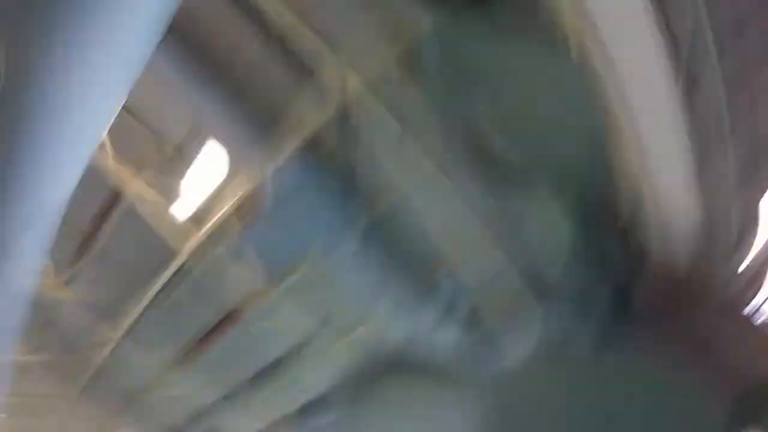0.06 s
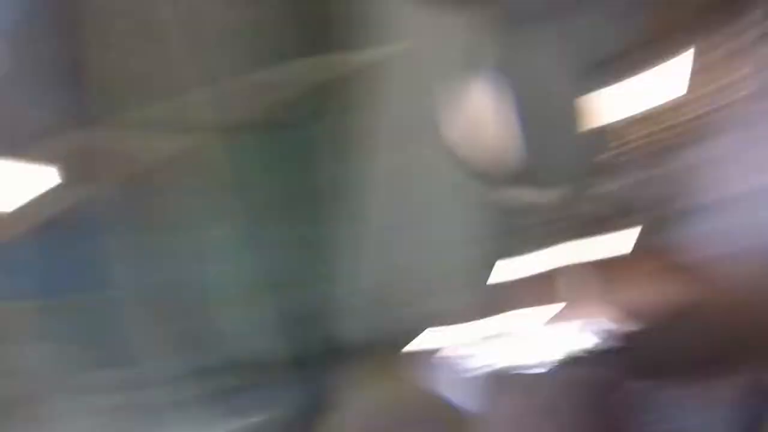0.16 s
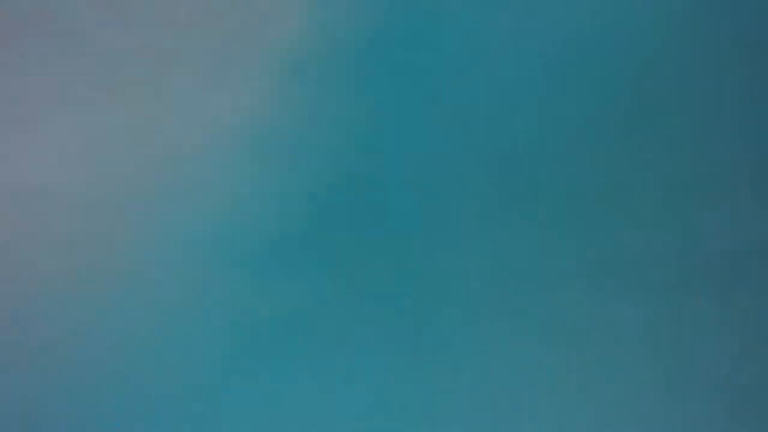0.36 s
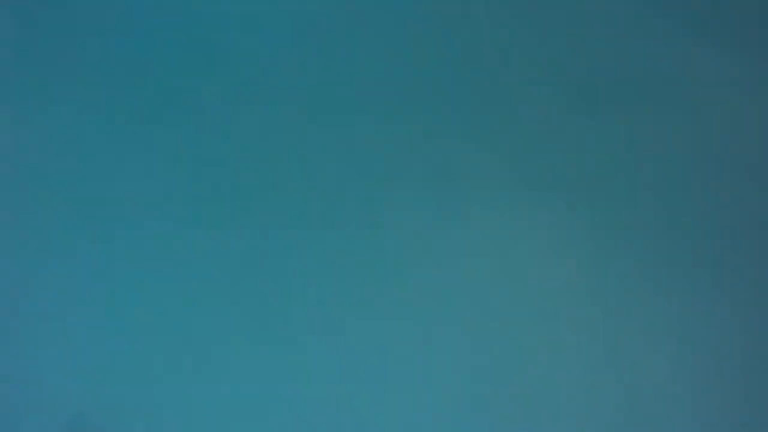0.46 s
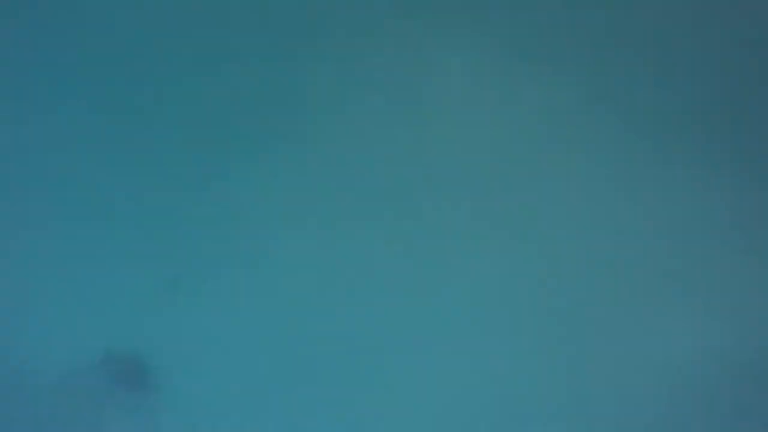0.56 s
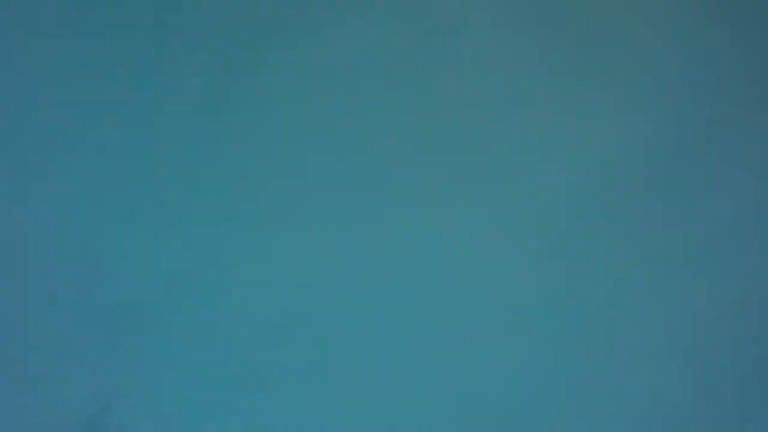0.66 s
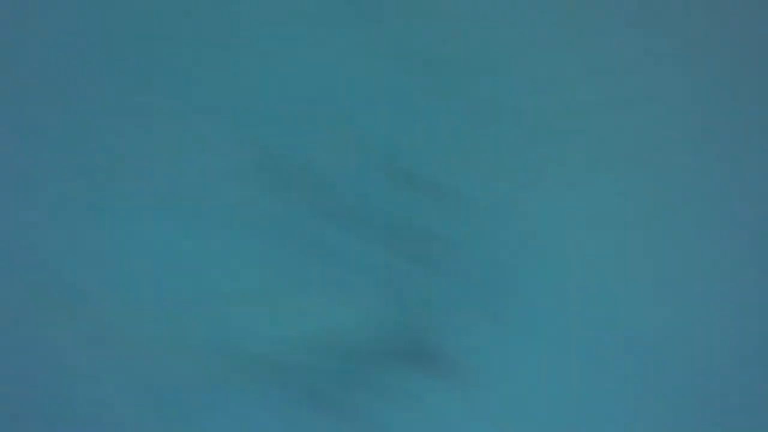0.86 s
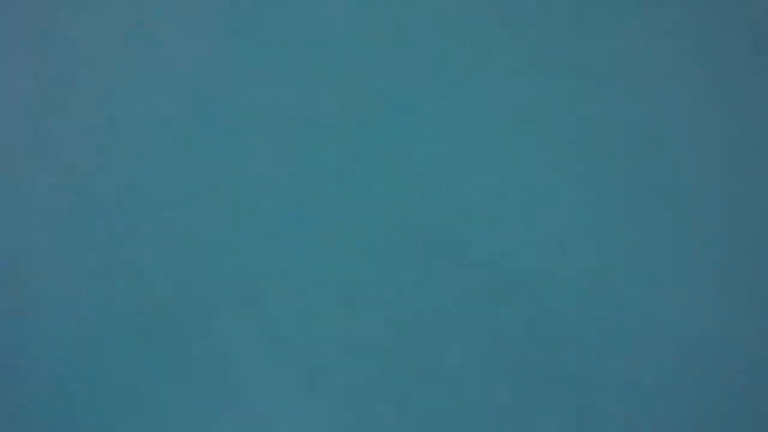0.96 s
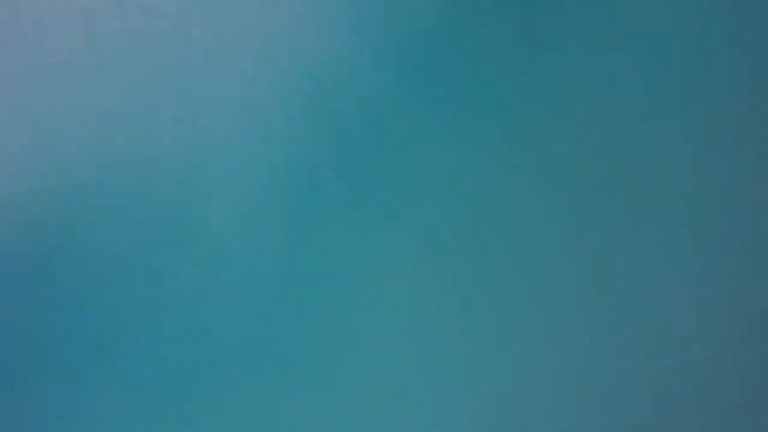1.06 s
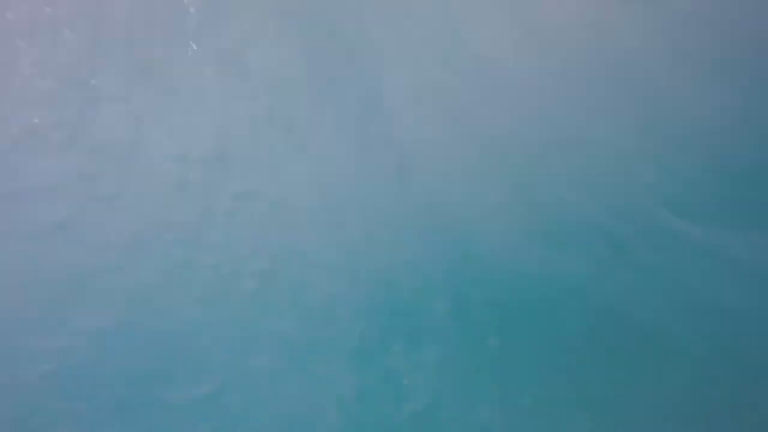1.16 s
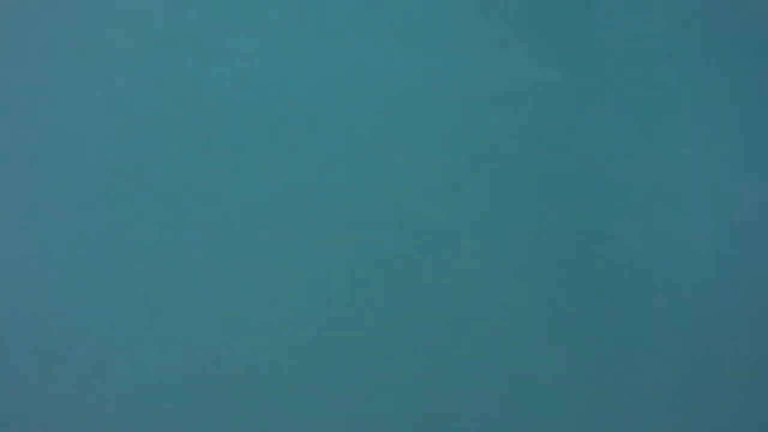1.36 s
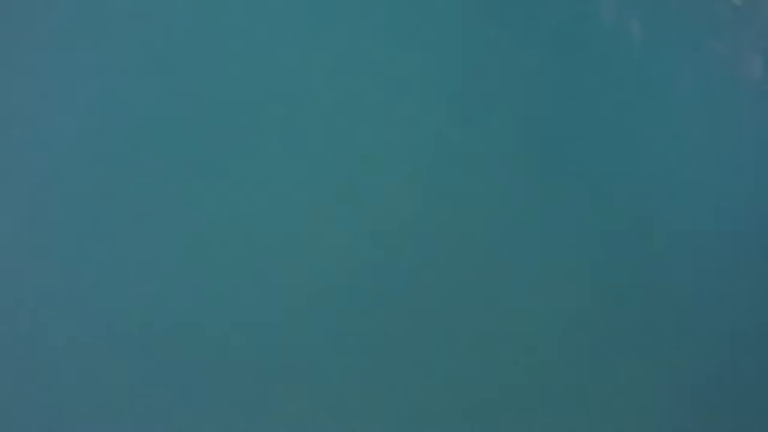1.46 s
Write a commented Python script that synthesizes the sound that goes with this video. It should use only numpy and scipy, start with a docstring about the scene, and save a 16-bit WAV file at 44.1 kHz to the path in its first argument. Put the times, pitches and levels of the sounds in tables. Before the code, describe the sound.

Close splashing water, heard from a waterproof camera riding a slide into an indoor pool. A hissing rush and crackling spray lead to a thudding plunge, churning bubbles, another splash and a few ticking drops.

```python
"""A camera in a waterproof case rides a water slide into an indoor pool.
Water rushes down the chute; spray crackles and slaps the case. At 0.5 s the case plunges in with
a pressure surge, the rush fades, and air dragged under churns away as ringing bubbles. Near 1 s
the thrown-up water falls back in a second splash. Last drops and bubbles tick against the case."""
import sys
import numpy as np
from scipy import signal
from scipy.fft import rfft, irfft
from scipy.io import wavfile

SR = 44100
rng = np.random.default_rng(int(sys.argv[2]) if len(sys.argv) > 2 else 0)


def bounce(signal):
    """Save signal as a 16-bit WAV file at the path given by the first command-line argument."""
    frames = np.transpose(np.atleast_2d(signal))
    limited = np.clip(frames, -1, 1)
    pcm = np.round(limited * 32767).astype(np.int16)
    wavfile.write(sys.argv[1], SR, pcm)


N = 66150
T = np.arange(N) / SR

# Spectrum of the chute rush and the hall tail. Each row: frequency in Hz, density in dB.
RUSH_SPECTRUM = [(100, -29), (310, -24), (550, -5), (800, -14), (1000, -16), (1400, 3), (1900, -7.5),
                 (2400, -3), (3200, -5.5), (4800, -20), (6100, -20.5), (7300, -35), (8600, -28),
                 (14000, -65)]


def from_db(db):
    """Decibels to gain."""
    return 10 ** (np.asarray(db) / 20)


def unit_rms(x):
    """Scale to rms 1."""
    return x / np.sqrt(np.mean(x ** 2) + 1e-20)


def envelope(rows):
    """Gain over time. Each row: time in seconds, level in dB."""
    return from_db(np.interp(T, *np.transpose(rows)))


def gain_at(spectrum, hz):
    """Gain of a spectrum, interpolated over log frequency."""
    points_hz, db = np.transpose(spectrum)
    return from_db(np.interp(np.log(hz), np.log(points_hz), db))


def add(out, start_s, sound):
    """Mix a sound into out."""
    i = int(np.clip(start_s * SR, 0, N - 1))
    out[i:i + len(sound)] += sound[:N - i]


def noise(spectrum):
    """Steady shaped noise, falling steeply beyond the spectrum's ends; rms 1."""
    hz = np.maximum(np.arange(N // 2 + 1) * SR / N, 1)
    skirts = 1 / np.sqrt((1 + (spectrum[0][0] / hz) ** 8) * (1 + (hz / spectrum[-1][0]) ** 8))
    return unit_rms(irfft(rfft(rng.standard_normal(N)) * gain_at(spectrum, hz) * skirts, N))


def resonate(x, hz, width_hz):
    """Two-pole resonance, peak gain 1."""
    radius = np.exp(-np.pi * width_hz / SR)
    feedforward = np.array([1, 0, -1]) * (1 - radius ** 2) / 2
    feedback = [1, -2 * radius * np.cos(2 * np.pi * hz / SR), radius ** 2]
    return signal.lfilter(feedforward, feedback, x + 1e-18)


def ring(hz, glide_oct_per_s, swell_s, t60_s):
    """Gliding sine that swells and decays; envelope peak 1."""
    t = T[:int(np.clip((t60_s + 2 * swell_s) * SR, 16, N))]
    shape = (1 - np.exp(-(t / swell_s) ** 2)) * from_db(-60 * t / t60_s)
    phase = 2 * np.pi * np.cumsum(hz * 2 ** (glide_oct_per_s * t)) / SR
    return np.sin(phase) * shape / (shape.max() + 1e-12)


def bubble_cloud(spectrum, per_s, t60_cycles, spread_db, rise_oct, pitches):
    """Bubbles of random onset and strength, each rising in pitch as it rings down; rms 1."""
    out = np.zeros(N)
    for hz in np.geomspace(spectrum[0][0], spectrum[-1][0], pitches):
        births = rng.random(N) < per_s / pitches / SR
        strengths = from_db(spread_db * np.minimum(rng.exponential(1, N), 4)) * rng.choice([-1, 1], N)
        hz = hz * np.exp(0.044 * rng.uniform(-0.96, 1))
        bubble = ring(hz, rise_oct * hz / t60_cycles, swell_s=0.28 / hz, t60_s=t60_cycles / hz)
        train = signal.fftconvolve(births * strengths, bubble)[:N]
        out += gain_at(spectrum, hz) * np.sqrt(hz) * unit_rms(train)  # higher bands are wider
    return unit_rms(out)


def chute():
    """A sheet of water hisses down the slide and excites hollow resonances."""
    # Each row: time in seconds, level in dB.
    rush_levels = [(0, -38.5), (.14, -34.5), (.22, -36.5), (.3, -37.5), (.5, -30.5), (.8, -63), (1.5, -74)]
    # Each row: frequency in Hz, width in Hz, level in dB.
    resonances = [(806, 51, -8), (1377, 43, -3)]
    hollow = sum(from_db(db) * unit_rms(resonate(rng.standard_normal(N), hz, width_hz))
                 for hz, width_hz, db in resonances)
    return envelope(rush_levels) * unit_rms(noise(RUSH_SPECTRUM) + hollow)


def churn():
    """Air dragged under breaks into bubbles and large pockets; the flow buffets the case."""
    # Each row: time in seconds, level in dB.
    bubble_levels = [(0, -53), (.305, -42.5), (.325, -40), (.41, -26), (.46, -30.5), (.57, -27),
                     (.62, -22.5), (.68, -27), (.74, -21.5), (.79, -34.5), (.86, -31), (.92, -38),
                     (.965, -31), (1.015, -17.5), (1.08, -21.5), (1.125, -20.5), (1.18, -30), (1.29, -35),
                     (1.41, -36.5), (1.5, -40.5)]
    pocket_levels = [(0, -49), (.29, -44), (.325, -28), (.4, -37.5), (.48, -34.5), (.52, -27), (.57, -24.5),
                     (.62, -26.5), (.67, -19), (.77, -30.5), (.81, -21), (.86, -35.5), (.95, -30),
                     (1.01, -21.5), (1.1, -29), (1.25, -36.5), (1.34, -43.5), (1.5, -45.5)]
    buffet_levels = [(0, -38.5), (.08, -33.5), (.18, -36.5), (.34, -34), (.44, -40), (.52, -20), (.6, -53),
                     (.73, -30), (.86, -41), (.94, -31.5), (1.04, -21.5), (1.12, -38.5), (1.3, -44),
                     (1.5, -40.5)]
    # Each row: frequency in Hz, density in dB.
    bubble_spectrum = [(280, -1), (400, -5), (560, -2.5), (760, -2.5), (900, -18.5), (1100, -39)]
    pocket_spectrum = [(75, 0.5), (110, -1.5), (170, -1), (280, -2.5)]
    buffet_spectrum = [(14, 16), (40, 0), (65, -2.5), (100, -36)]
    bubbles = bubble_cloud(bubble_spectrum, per_s=1200, t60_cycles=14.3,
                           spread_db=1.5, rise_oct=0.31, pitches=40)
    pockets = bubble_cloud(pocket_spectrum, per_s=700, t60_cycles=5.8,
                           spread_db=2.6, rise_oct=0.22, pitches=14)
    buffet = envelope(buffet_levels) * noise(buffet_spectrum)
    return envelope(bubble_levels) * bubbles + envelope(pocket_levels) * pockets + buffet


def glugs():
    """Big bubbles pinch off next to the case."""
    # Each row: start in seconds, peak in dB, pitch in Hz, glide in octaves/s, swell and t60 in seconds.
    big_bubbles = [(0.199, -15, 162.4, -33, 0.0066, 0.11), (.3966, -17, 488, -4, 0.001, 0.035),
                   (.503, -7, 228, 21, 0.0038, 0.017), (0.507, -12.5, 119, -10, 0.0024, 0.089),
                   (.553, -15, 114.3, -2.5, 0.0019, 0.18), (.6, -14.5, 470, 3, 0.0017, .035),
                   (.601, -9.5, 765, 3, 0.003, 0.037), (.603, -10, 1063, 8, 0.00054, 0.028),
                   (.66, -15.5, 547.5, 2.5, 0.0041, 0.18), (.686, -14, 744, 8, 0.0031, 0.059),
                   (.8395, -11, 566, -1, 0.0022, 0.011), (1.045, -19, 1015, 7, .002, .04),
                   (1.113, -14.5, 507, 3.5, 0.0028, 0.15), (1.24, -23.5, 330, 3, 0.0034, 0.12)]
    out = np.zeros(N)
    for start_s, db, hz, glide_oct_per_s, swell_s, t60_s in big_bubbles:
        add(out, start_s, from_db(db) * ring(hz, glide_oct_per_s, swell_s, t60_s))
    return out


def surges():
    """Pressure drops and swings back as the case ploughs into the water."""
    # Each row: start in seconds, peak in dB, pitch in Hz, swell and t60 in seconds.
    impacts = [(0.208, -16, 32, 0.012, 0.07), (0.499, -8, 37.7, 0.012, 0.072)]
    out = np.zeros(N)
    for start_s, db, hz, swell_s, t60_s in impacts:
        add(out, start_s, -from_db(db) * ring(hz, 0, swell_s, t60_s))
    return out


def spray():
    """Drops crackle on the case among small ringing bubbles; fizz rises where spray meets air."""
    # Each row: time in seconds, level in dB.
    spray_levels = [(0, -55), (.222, -36), (.252, -25.5), (.28, -32.5), (.312, -31), (.322, -19.5),
                    (.40, -26.5), (.45, -23), (.476, -30.5), (.55, -29), (.64, -24.5), (.735, -20.5),
                    (.79, -27), (.84, -40), (.925, -37.5), (.958, -34.5), (.976, -18.5), (1.008, -13.5),
                    (1.036, -18.5), (1.072, -20), (1.09, -22), (1.14, -22.5), (1.175, -30), (1.23, -33.5),
                    (1.29, -33), (1.38, -41.5), (1.43, -34.5), (1.5, -49)]
    fizz_levels = [(0, -69), (.22, -49.5), (.25, -35.5), (.305, -43), (.33, -37.5), (.44, -42), (.51, -64),
                   (.66, -65), (.75, -37), (.87, -67), (.95, -52.5), (1.01, -30), (1.1, -38), (1.17, -52),
                   (1.3, -48), (1.5, -99)]
    # Each row: frequency in Hz, density in dB.
    spray_spectrum = [(850, -8.5), (1100, -9), (1480, 4.5), (1900, 1), (2500, 5), (3100, -0.5),
                      (4000, -8.5), (5000, -41), (5700, -48), (6300, -15), (7300, -28), (8500, -25),
                      (13000, -34.5)]
    fizz_spectrum = [(4500, 5.5), (5400, -5.5), (6300, 3), (7300, -11), (8600, -0.5), (11000, -37),
                     (13500, -12)]
    crackle = bubble_cloud(spray_spectrum, per_s=7000, t60_cycles=6.7,
                           spread_db=4, rise_oct=0.036, pitches=30)
    bubbles = bubble_cloud(spray_spectrum, per_s=6500, t60_cycles=43,
                           spread_db=3, rise_oct=0.14, pitches=60)
    fizz = bubble_cloud(fizz_spectrum, per_s=4000, t60_cycles=37,
                        spread_db=3, rise_oct=0.032, pitches=30)
    drops = unit_rms(from_db(-5.5) * crackle + bubbles)
    return envelope(spray_levels) * drops + envelope(fizz_levels) * fizz


def clumps(depth_db=1.33, top_hz=68):
    """Water arrives in clumps: a quick random flutter of gain."""
    lowpass = signal.butter(2, top_hz, fs=SR, output="sos")
    swing = signal.sosfilt(lowpass, rng.standard_normal(N + SR))[SR:]
    return from_db(depth_db * unit_rms(swing))


def sloshes():
    """Bodies of water hit the case, each a turbulent swell around one pitch."""
    # Each row: start in seconds, level in dB, centre and width in Hz, swell and t60 in seconds.
    swells = [(.23, -24.5, 2300, 696, 0.02, 0.12), (0.3172, -15, 5300, 2500, 0.00066, 0.014),
              (0.3171, -20.5, 164, 240, 0.0011, 0.031), (0.487, -13.5, 1330, 1480, 0.00053, 0.042),
              (.601, -13.5, 720, 750, 0.0031, 0.031), (.648, -21.5, 690, 626, 0.0094, 0.87),
              (0.9367, -17.5, 1040, 1290, 0.0011, 0.042), (.981, -19.5, 125, 90, 0.008, 0.084),
              (1.003, -18.5, 795, 496, .008, 0.086), (1.139, -22.5, 2780, 890, .008, 0.038),
              (1.229, -27.5, 680, 890, 0.0066, 0.075), (1.3087, -17, 1620, 1250, 0.0025, 0.039)]
    out = np.zeros(N)
    for start_s, db, hz, width_hz, swell_s, t60_s in swells:
        shape = (1 - np.exp(-(T / swell_s) ** 2)) * from_db(-60 * T / t60_s)
        band = resonate(rng.standard_normal(N + SR), hz, width_hz)
        swirl = resonate(band, hz, width_hz)[SR:]
        add(out, start_s, from_db(db) * unit_rms(swirl) * shape / shape.max())
    return out


def slaps(splatter_attack_s=0.000094):
    """Water slaps the case: a short ring plus a burst of splatter."""
    # Each row: start in seconds, ring peak in dB, pitch in Hz, ring t60 in seconds,
    # splatter level in dB, splatter t60 in seconds.
    hits = [(0.3166, 0.5, 3100, 0.021, -9.5, 0.036), (0.3166, 1, 3720, 0.0073, -14, 0.009),
            (.3212, -1, 2890, 0.01, -22, 0.013), (0.3485, -19, 6100, .01, -23, 0.0065),
            (0.3768, -12.5, 1730, 0.011, -13, 0.022), (0.397, -11.5, 3540, 0.0065, -21.5, 0.022),
            (0.4391, -13, 1740, 0.012, -33, 0.016), (0.486, -14, 2210, 0.019, -24, 0.04),
            (.4864, -11, 6450, 0.0066, -28, 0.011), (.7089, -6, 1960, 0.0078, -14, .012),
            (0.7675, -17, 2180, 0.029, -28, 0.026), (.9354, -13, 2660, 0.011, -17, 0.037),
            (0.9712, -11, 2680, 0.014, -19, 0.016), (.9913, -20, 2130, 0.01, -12.5, 0.032),
            (1.0461, -21, 2050, 0.0095, -16.5, .03), (1.0976, -8.5, 2270, 0.0088, -19, .01),
            (1.111, -14, 1090, 0.036, -15.5, 0.037), (1.1913, -19, 2900, 0.018, -27, .045),
            (1.316, -14.5, 2600, 0.0063, -23, 0.056), (1.3594, -18, 2450, 0.017, -23, 0.037),
            (1.402, -25, 2070, 0.048, -19.5, 0.012), (1.4177, -15.5, 2980, 0.0055, -24.5, 0.016),
            (1.4397, -24.5, 3060, 0.022, -25, 0.015)]
    # Each row: frequency in Hz, density in dB.
    splatter_spectrum = [(600, 7.5), (1000, -3.5), (1500, 6), (2900, 5.5), (4500, -12), (6300, -24),
                         (9000, -23.5), (13000, -23.5)]
    out = np.zeros(N)
    for start_s, db, hz, t60_s, splatter_db, splatter_t60_s in hits:
        add(out, start_s, from_db(db) * ring(hz, glide_oct_per_s=1, swell_s=0.00023, t60_s=t60_s))
        burst = (1 - np.exp(-T / splatter_attack_s)) * from_db(splatter_db - 60 * T / splatter_t60_s)
        add(out, start_s, burst * noise(splatter_spectrum))
    return out


def patter():
    """Sparse droplets land on the case, each a short pitched tick."""
    # Each row: time in seconds, level in dB.
    droplet_levels = [(0, -80), (.33, -53), (.55, -61), (.78, -49.5), (.9, -55), (1.08, -43.5), (1.25, -49),
                      (1.38, -54), (1.5, -101)]
    # Each row: frequency in Hz, density in dB.
    droplet_spectrum = [(5000, -2), (6500, 3), (9000, -7.5), (12500, -9)]
    droplets = bubble_cloud(droplet_spectrum, per_s=150, t60_cycles=34,
                            spread_db=2.8, rise_oct=0.082, pitches=24)
    return envelope(droplet_levels) * droplets


def ticks():
    """Tiny bubbles ping as they burst on the case."""
    # Each row: start in seconds, peak in dB, pitch in Hz.
    bursts = [(0.4856, -25, 8030), (.536, -22.5, 5050), (0.772, -17, 3940), (.781, -26, 8200),
              (.804, -27, 8000), (.862, -31.5, 6800), (0.899, -21, 3250), (.9635, -24, 6440),
              (1.031, -23, 6640), (1.081, -26, 9000), (1.092, -28, 6570), (1.153, -32, 6400),
              (1.157, -30, 7600), (1.222, -26.5, 6100), (1.275, -36, 9050), (1.293, -35, 5200),
              (1.311, -33, 7240), (1.317, -28, 6300), (1.402, -25.5, 6900), (1.4225, -36, 8400),
              (1.472, -39, 6240)]
    out = np.zeros(N)
    for start_s, db, hz in bursts:
        add(out, start_s, from_db(db) * ring(hz, glide_oct_per_s=3.4, swell_s=0.00024, t60_s=0.0048))
    return out


def hall(x, t60_s=0.61, level_db=-25):
    """Diffuse tail of the pool hall."""
    tail = noise(RUSH_SPECTRUM) * from_db(-60 * T / t60_s)
    return from_db(level_db) * signal.fftconvolve(x, tail / np.sqrt(np.sum(tail ** 2)))[:N]


def scene():
    """Water close to the case, with a little hall on the splashes; mono."""
    # The hiss dips just before the first slap. Each row: time in seconds, gain in dB.
    lull = [(.304, 0), (.306, -13), (.315, -11), (.3165, 0)]
    drops, bubbles, flutter = spray(), churn(), clumps()
    splashes = flutter * drops + patter() + slaps() + ticks()
    above_water = envelope(lull) * (chute() + splashes + hall(splashes))
    return (above_water + flutter * bubbles + sloshes() + glugs() + surges())[None]


def record(dry, rolloff_hz=13400, clip_level=0.92, cutoff_hz=15200):
    """The highest treble rolls off gently, the loudest peaks are softly limited, the top is cut."""
    dull = signal.sosfilt(signal.butter(6, rolloff_hz, fs=SR, output="sos"), dry)
    clipped = dull / (1 + np.abs(dull / clip_level) ** 6) ** (1 / 6)
    return signal.sosfiltfilt(signal.ellip(8, 0.1, 50, cutoff_hz, fs=SR, output="sos"), clipped)


dry = scene()
out = record(dry)
bounce(out)
```